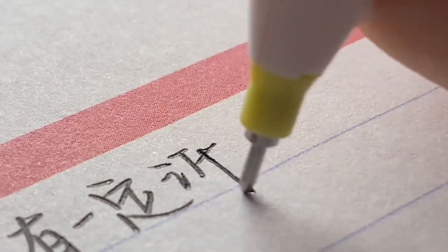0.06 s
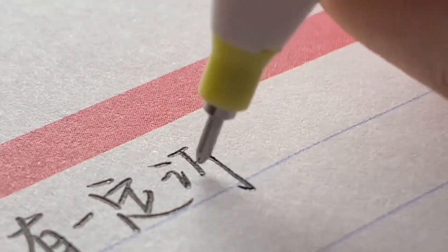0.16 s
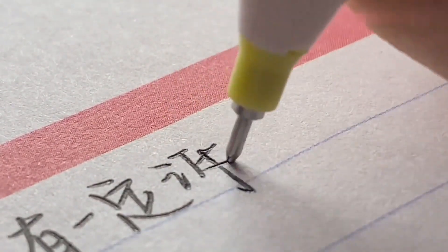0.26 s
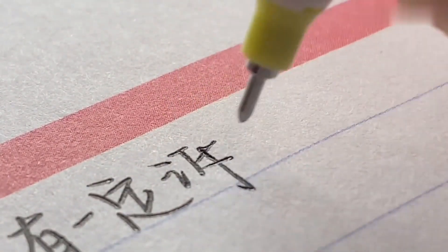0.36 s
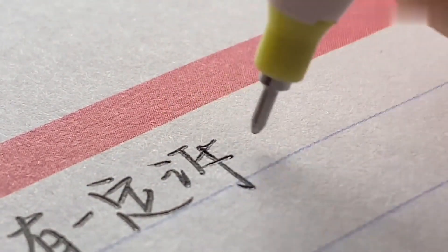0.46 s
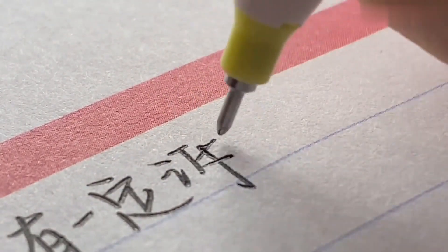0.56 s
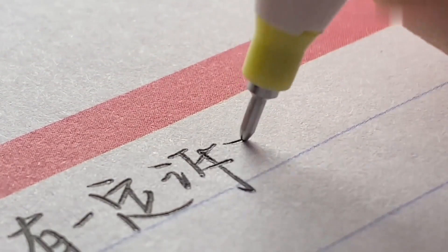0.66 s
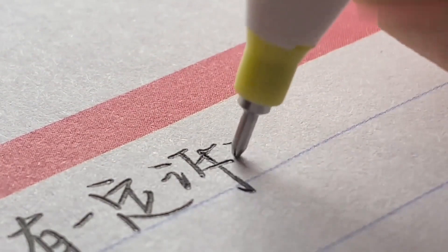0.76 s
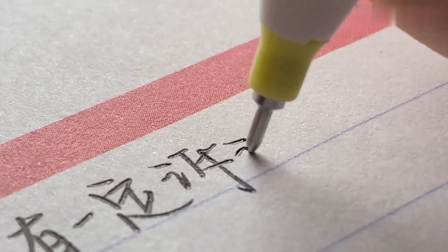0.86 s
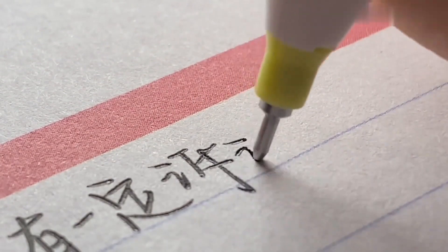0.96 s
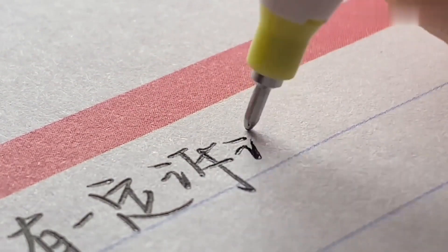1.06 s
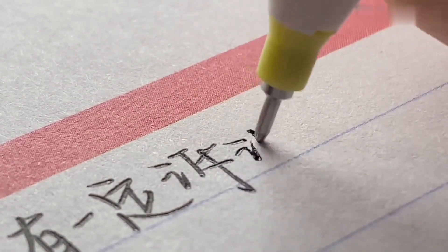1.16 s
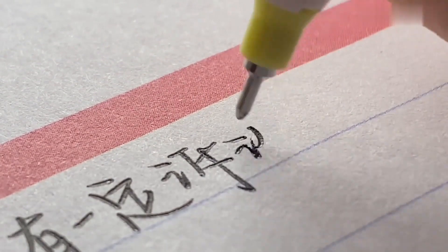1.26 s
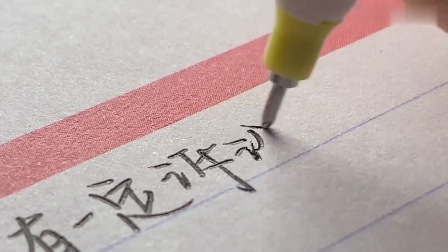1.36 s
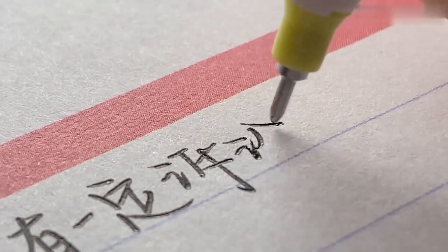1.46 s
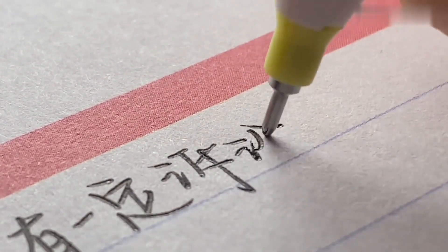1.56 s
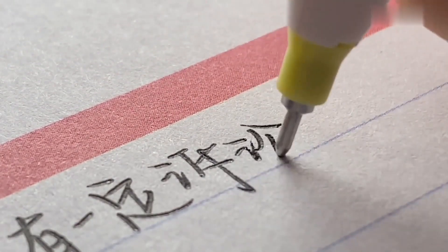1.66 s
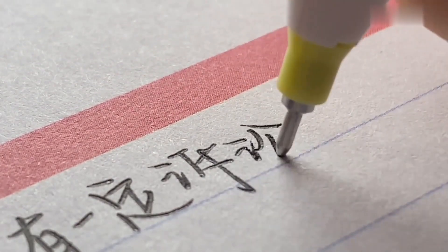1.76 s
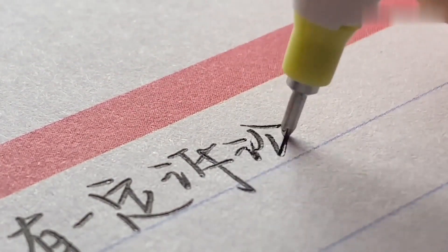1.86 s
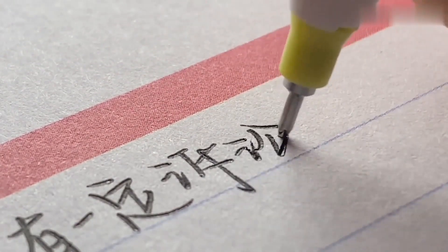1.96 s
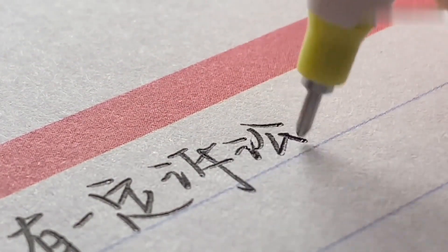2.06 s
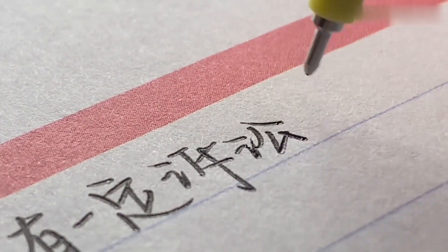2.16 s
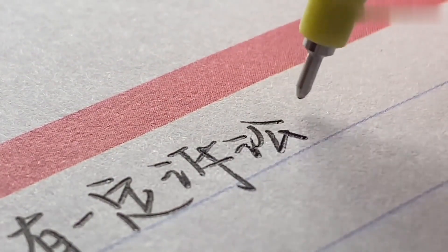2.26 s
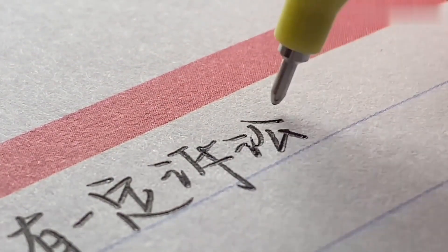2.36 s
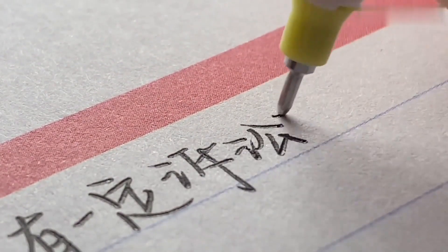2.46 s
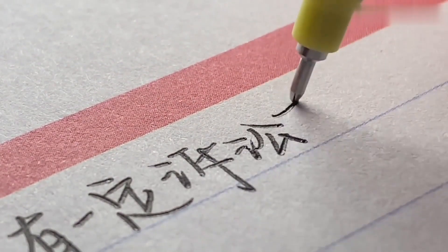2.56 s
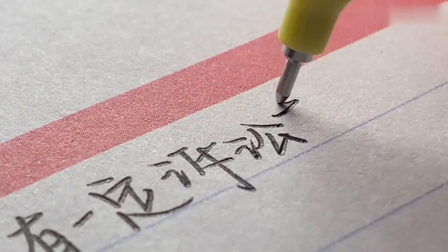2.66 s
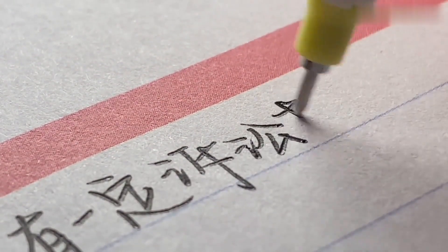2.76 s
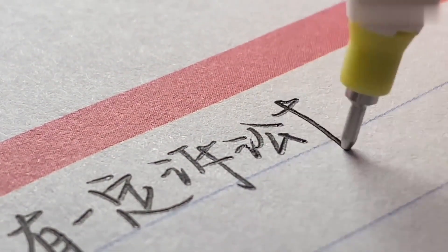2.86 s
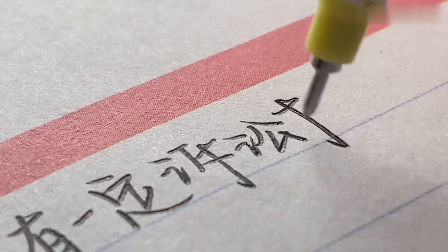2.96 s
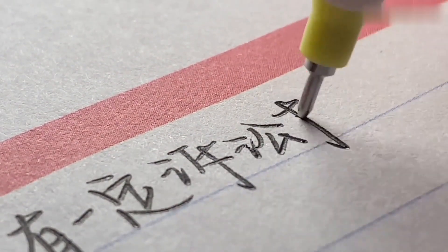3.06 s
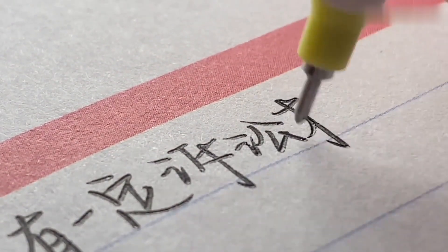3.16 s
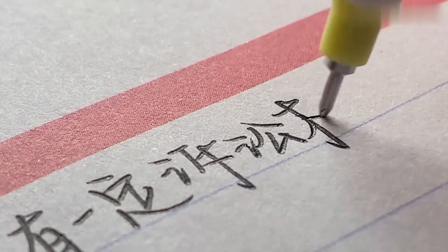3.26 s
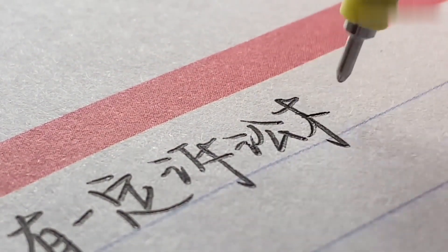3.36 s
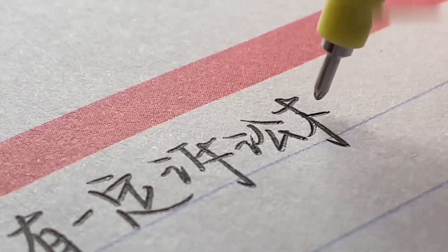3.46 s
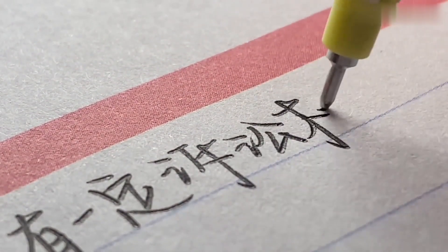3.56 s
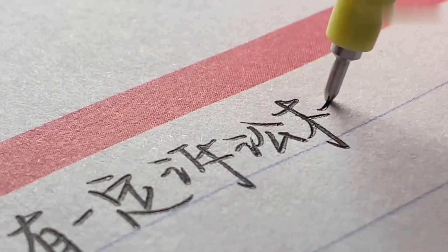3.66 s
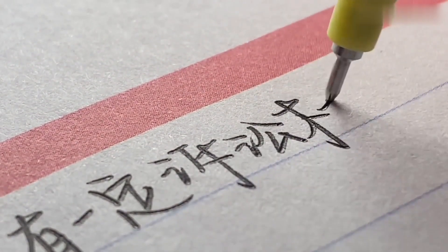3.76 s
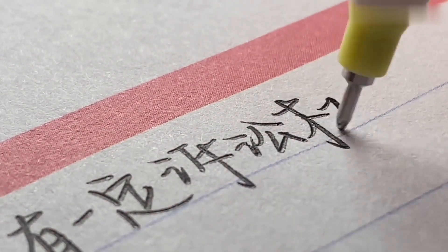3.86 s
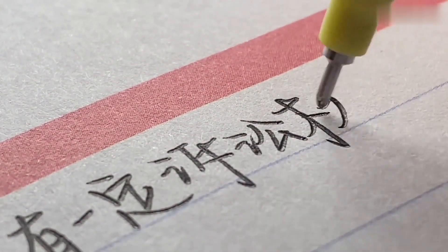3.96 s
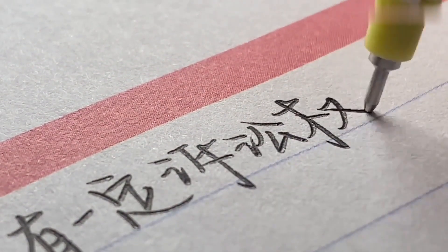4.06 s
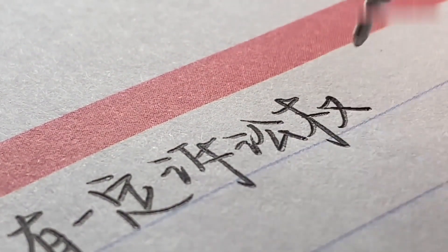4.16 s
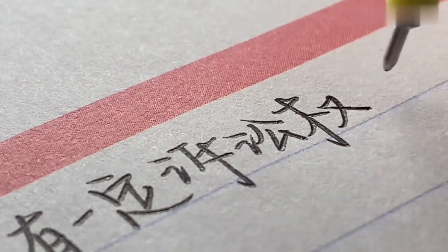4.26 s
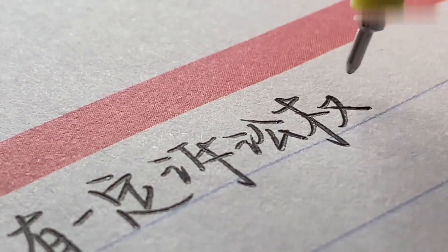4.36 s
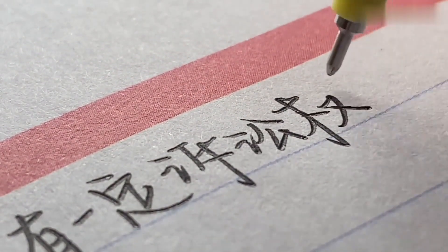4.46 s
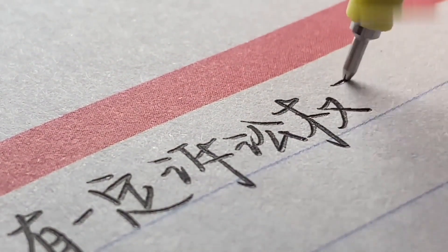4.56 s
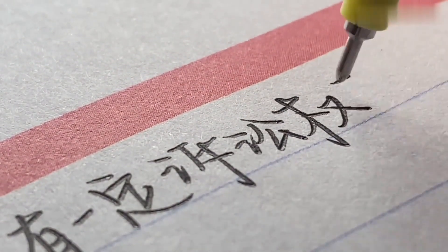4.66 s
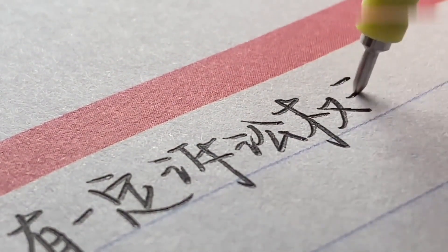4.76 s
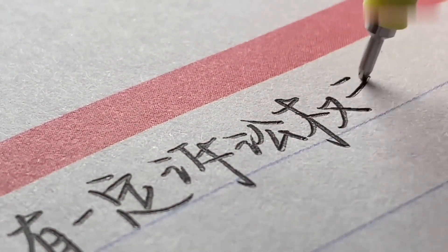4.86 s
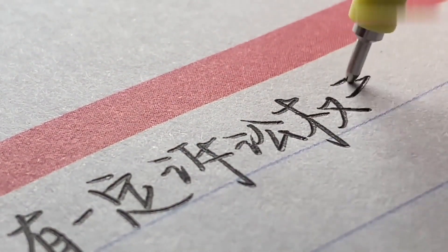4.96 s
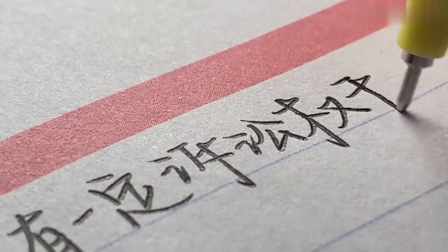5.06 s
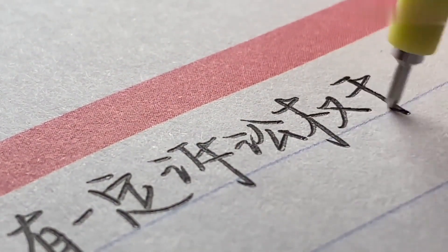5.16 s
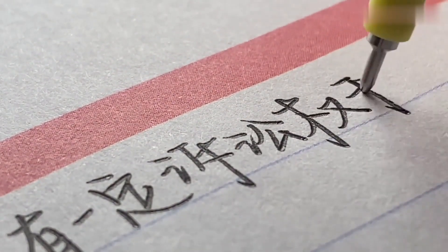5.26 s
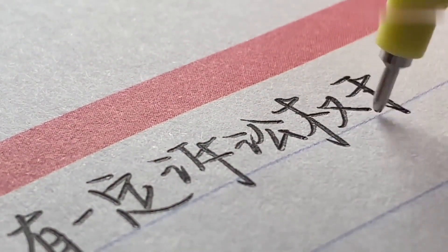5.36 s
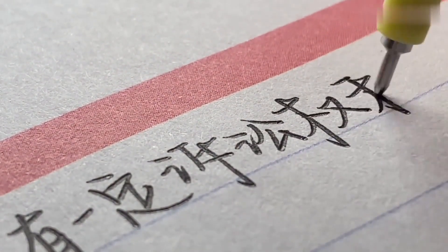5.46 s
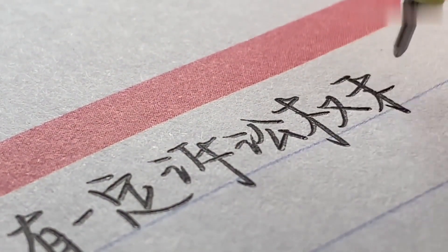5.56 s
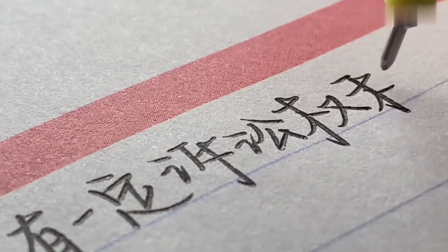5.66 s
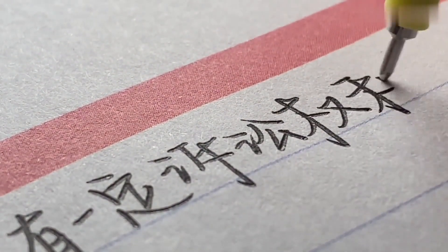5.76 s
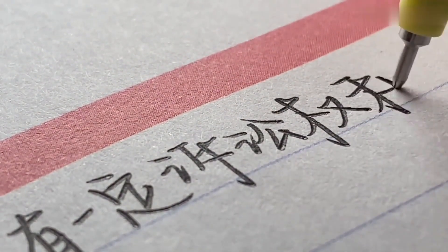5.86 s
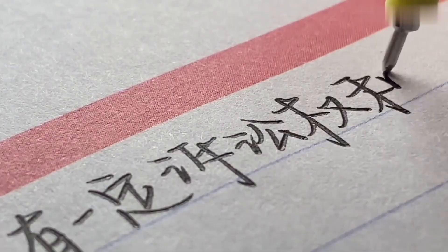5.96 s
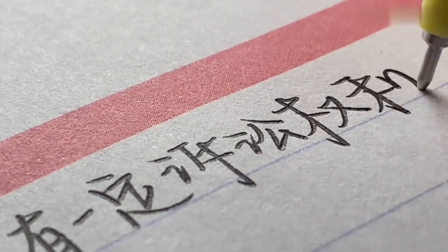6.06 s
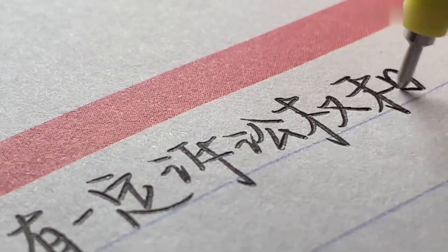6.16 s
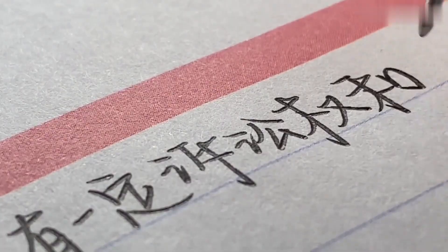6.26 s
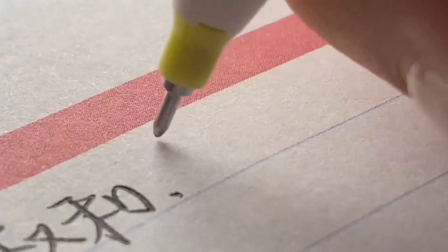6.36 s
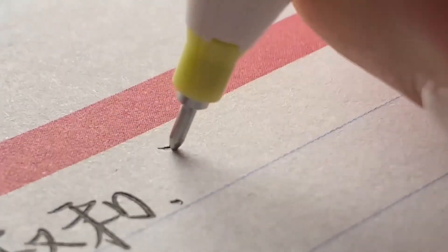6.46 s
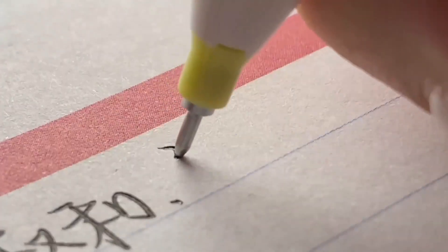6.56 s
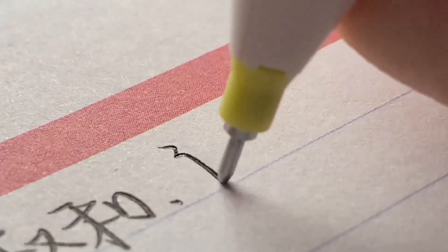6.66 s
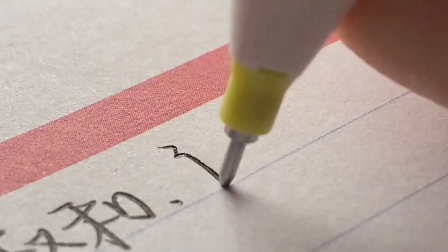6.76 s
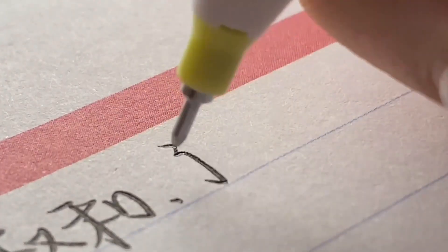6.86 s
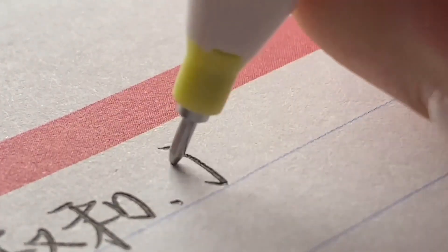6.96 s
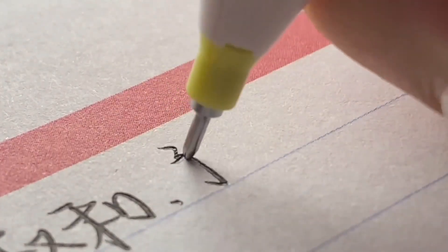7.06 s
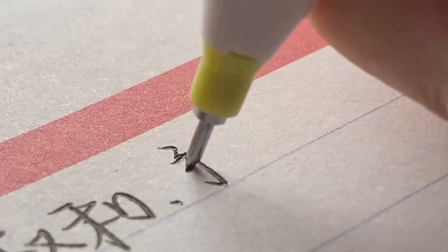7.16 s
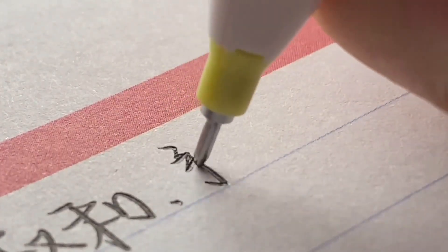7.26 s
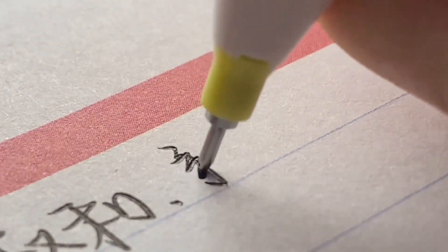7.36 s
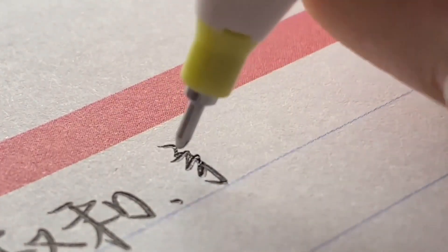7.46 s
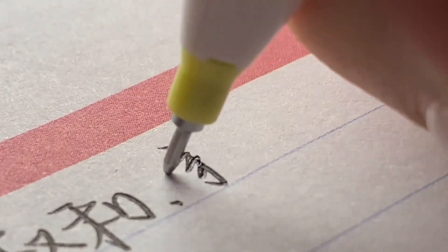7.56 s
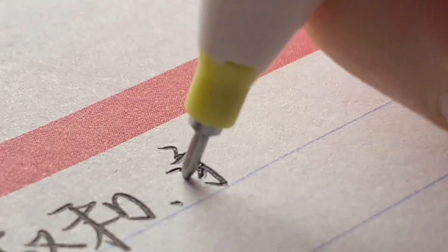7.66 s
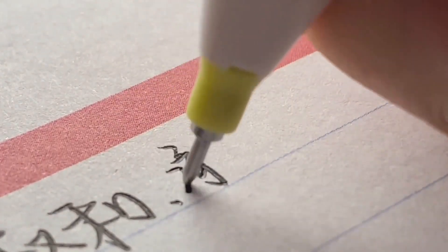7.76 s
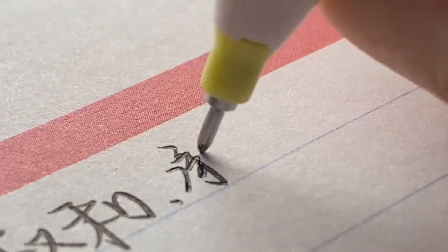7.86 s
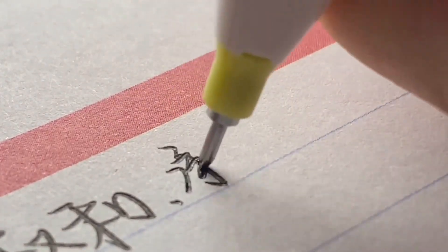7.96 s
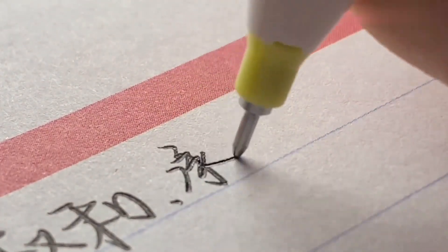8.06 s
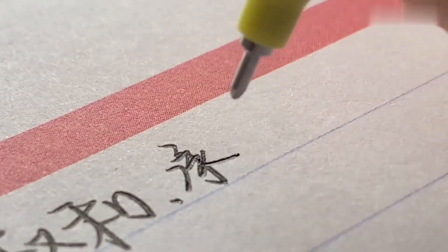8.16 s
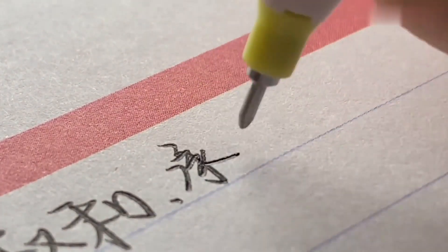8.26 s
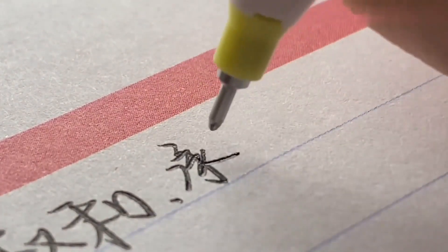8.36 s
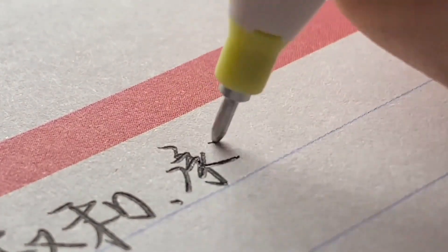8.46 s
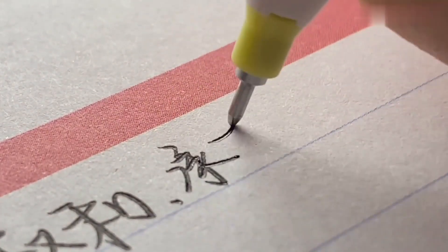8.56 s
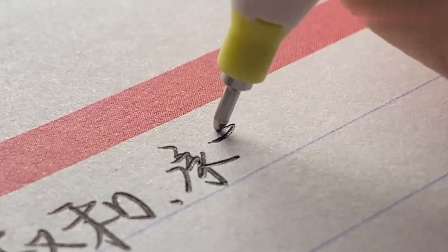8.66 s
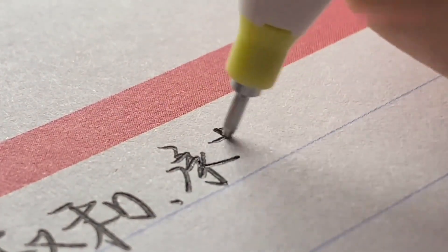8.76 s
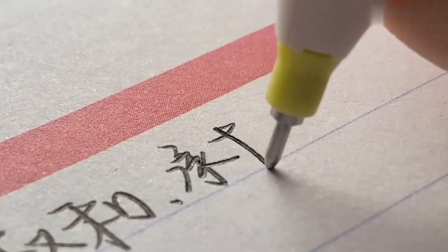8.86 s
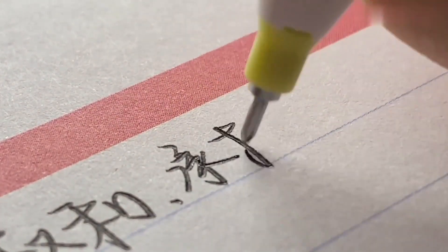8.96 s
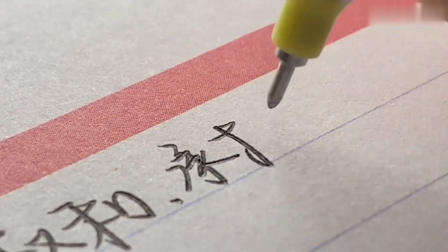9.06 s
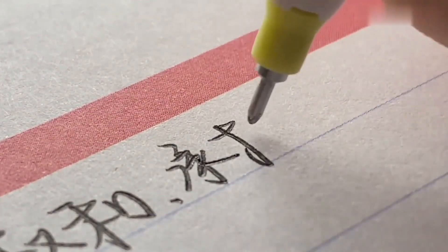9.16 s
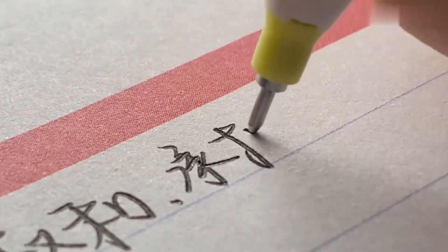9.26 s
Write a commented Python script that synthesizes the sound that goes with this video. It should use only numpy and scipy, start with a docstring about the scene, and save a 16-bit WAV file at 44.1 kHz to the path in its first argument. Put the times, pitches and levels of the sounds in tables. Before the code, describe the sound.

A fine-tipped pen writes on a paper pad in a quiet room, heard very close. Short dry scratches come several per second, uneven in strength, with a fine bright hiss. Crisp little ticks, often doubled, mark the tip landing and lifting, while the pad and desk give soft, low, hollow thumps beneath firmer strokes. Faint wavering room air fills the gaps.

```python
"""Short hissing strokes and bright ticks: a fine pen writes on a paper pad, close to the microphone in a quiet room.
Each stroke is friction: the tip slips over the fibres, which hiss and set the barrel ringing.
The loose refill ticks by impact as the tip lands and lifts, and snags shake the barrel.
The push of the hand makes the pad and the desk rumble at their resonances, over faint, wavering room air."""
import sys
import numpy as np
from scipy import signal
from scipy.fft import rfft, irfft, next_fast_len
from scipy.io import wavfile
from scipy.ndimage import uniform_filter1d

SR = 44100
rng = np.random.default_rng(int(sys.argv[2]) if len(sys.argv) > 2 else 0)


def unload_audio(sound):
    """Save the sound as a 16-bit wav file, at the path given as the first command line argument."""
    columns = np.transpose(np.atleast_2d(sound))
    # keep every value between -1 and 1, then stretch to whole-number steps
    steps = np.round(np.clip(columns, -1, 1) * 32767)
    wavfile.write(sys.argv[1], SR, steps.astype(np.int16))


N = 410571
TIME = np.arange(N) / SR  # s
FREQS = np.fft.rfftfreq(next_fast_len(N), 1 / SR)  # Hz

# All levels in the tables are relative: each layer adds its own gain.
# Strokes of the tip. Each row: time of full speed in seconds, length in seconds, scratch level in dB,
# weight on the pad in dB over the scratch, fine hiss in dB over the scratch.
STROKES = [(-0.048, 0.099, -54.5, 18, -0.5), (0.135, 0.057, -56.5, 3, 2.5), (0.257, 0.047, -53, 6.5, 1),
           (0.399, 0.068, -51.0, -2, -3), (0.527, 0.057, -55.5, -7, 1.5), (0.663, 0.051, -58.5, 14, -1.5),
           (0.906, 0.047, -65.0, 6, 6), (1.039, 0.046, -57.0, 9.5, 0.5), (1.206, 0.082, -64.5, 15.5, 3),
           (1.279, 0.041, -59.5, -33, 3.5), (1.396, 0.049, -49.5, 4, -0.5), (1.491, 0.054, -62.5, 8.5, -1),
           (1.656, 0.041, -61.5, 7.5, 2.5), (1.845, 0.049, -59.5, 10.5, 3.5), (2.04, 0.05, -58, 15, 2),
           (2.179, 0.073, -48, -3.5, -5.5), (2.329, 0.11, -60.5, -6, 0), (2.514, 0.053, -54.5, 8.5, 3.5),
           (2.823, 0.051, -48, 15, 0.5), (2.98, 0.059, -56.5, 7, 2), (3.153, 0.11, -61, 13, 1.5),
           (3.289, 0.046, -54.5, 16, 2.5), (3.361, 0.048, -53, 6.5, -3), (3.464, 0.043, -69.0, -1, -1),
           (3.856, 0.061, -60.0, 16.5, 3.5), (3.923, 0.047, -55.5, -0.5, 2), (4.049, 0.052, -51, 10, 1),
           (4.132, 0.101, -59.5, 8, 0), (4.229, 0.076, -50.5, -7, -4.5), (4.347, 0.065, -57.5, -1, 3),
           (4.429, 0.067, -59.0, 6, -0.5), (4.585, 0.034, -62.0, 17.5, -1), (4.678, 0.045, -61, -9, -3),
           (4.819, 0.057, -54.5, 5.5, 0.5), (4.92, 0.062, -74, 1, 8), (5.081, 0.05, -52, 15.5, 2),
           (5.211, 0.056, -57.5, 10, 2), (5.391, 0.08, -60.0, 8.5, 1.5), (5.516, 0.052, -52.5, 11, 1),
           (5.594, 0.058, -51, 3, -4.5), (5.82, 0.034, -63, 11, 4.5), (5.941, 0.056, -76, 22, 11.5),
           (6.065, 0.051, -57, 10.5, 3), (6.197, 0.043, -57.5, 12.5, 3), (6.265, 0.091, -59, -13, -2),
           (6.437, 0.089, -64.5, 8.5, -3), (6.662, 0.065, -54.0, 12.5, 3), (6.859, 0.059, -52.5, 1.5, 0.5),
           (7.041, 0.03, -63, 15, 5), (7.209, 0.057, -69.5, 17.5, 8), (7.31, 0.04, -65, 17.5, 3),
           (7.411, 0.046, -65, 18.5, 3), (7.492, 0.072, -66.0, -8, -1), (7.62, 0.081, -66.5, 9, -13),
           (7.708, 0.043, -63.5, 17, 5.5), (7.847, 0.049, -54.5, -10, -2), (8.056, 0.065, -53.5, 13.5, 2),
           (8.19, 0.074, -53, -4, -1.5), (8.368, 0.09, -58.5, -3, 0.5), (8.53, 0.064, -56.5, 13, 1),
           (8.659, 0.1, -77, 13, 11), (8.825, 0.05, -52.5, 15.5, 4), (8.975, 0.13, -68.5, 18.5, 7),
           (9.036, 0.079, -51.0, -8, -1.5), (9.182, 0.071, -72.5, 1, 2), (9.304, 0.02, -60.5, 16.5, 0.5)]
# The tip lands and the refill ticks twice. Each row: start in seconds, level in dB, strongest pitch in Hz,
# time to the second tick in seconds, second tick in dB over the first.
LANDINGS = [(0.2037, -27.5, 3230, 0.0072, 4), (0.601, -29, 3100, 0.013, 4.5),
            (0.7584, -32, 3400, 0.015, -2), (1.078, -41, 4600, 0.025, 3), (1.3455, -33.5, 3250, 0.0134, 4),
            (1.5554, -40, 3570, 0.019, 3.5), (2.4259, -31, 3580, 0.021, 3.5),
            (3.058, -27.5, 3560, 0.007, -3), (3.2443, -26, 3470, 0.006, -2), (3.546, -31, 3560, 0.009, 0),
            (4.0023, -32, 4200, 0.0056, 5), (4.52, -29, 3000, 0.0086, 2), (4.741, -32, 4100, 0.0071, 3.5),
            (5.2832, -30.5, 4200, 0.0058, 0), (5.7455, -33.5, 4200, 0.011, 2),
            (6.3964, -32, 2830, 0.021, 1.5), (6.9767, -25, 3050, 0.0081, 0), (7.5787, -28, 3140, 0.0084, 2),
            (7.878, -34.5, 3800, 0.019, -4), (8.4618, -28.5, 2970, 0.01, 0.5),
            (9.2204, -34, 3380, 0.0155, -0.5)]
# The tip catches on the paper and slips free. Each row: start in seconds, level in dB.
SNAGS = [(0.685, -49), (2.0223, -36), (2.5017, -30), (3.3398, -36.5), (4.0372, -33), (5.529, -47),
         (5.5662, -36), (6.2412, -46), (7.7029, -47), (8.0352, -32), (8.5167, -38), (9.0169, -45)]
# The hand jabs the pad at the height of a hard stroke. Each row: time in seconds, level in dB.
JABS = [(1.388, -34.5), (2.027, -39.5), (2.812, -33.5), (2.834, -37), (4.043, -30.5), (5.074, -23.5),
        (5.495, -38), (6.075, -32), (8.818, -30)]
JAB_S = 0.0089  # rise and fall time
# Resonances of the barrel. Each row: frequency in Hz, width in Hz, level in dB.
BARREL = [(1748, 83, 1.5), (2012, 124, 12), (2050, 47, -13.5)]
# Resonances of the refill. Each row: frequency in Hz, width in Hz, level in dB.
REFILL = [(2300, 330, -2), (3100, 360, 1.5), (3800, 2500, -9.5), (4690, 650, 1.5), (6150, 790, -15.5),
          (11500, 5000, -1)]


def tip(ring_db, scratch_db, hiss_db, catch_db, tooth_db):
    """Friction noise: fibres rasp and ring the barrel, coarse ones catch; paper tooth modulates all together."""
    # Rasp of the fibres. Each row: frequency in Hz, density in dB per Hz.
    scratch_spectrum = [(700, -3), (1100, -19.5), (1400, -9), (2500, -6.5), (3200, -4.5), (4000, -4.5),
                        (5200, 0.5), (6500, -4.5), (7800, -13), (9500, -31)]
    # Fine hiss of the fibres. Each row: frequency in Hz, density in dB per Hz.
    hiss_spectrum = [(6000, -11.5), (8000, -1.5), (13500, 3.5), (15000, 2.5), (16000, -15)]
    catches_per_s = 160  # coarse fibres met while the tip moves
    ring, scratch, hiss = friction(skid_ring_db=0, skid_hiss_db=-1.5)
    tooth = from_db(tooth_db * drift(rate=54))
    drive = coloured(fibres(grain_db=0.5), [(1200, -4.5), (1800, 5.5), (2800, -4.0)])
    barrel = rms_one(resonate(drive, BARREL))
    rasp = coloured(fibres(grain_db=2.0), scratch_spectrum)
    fine = coloured(fibres(grain_db=3), hiss_spectrum)
    coarse = (rng.random(N) < catches_per_s / SR) * rng.standard_normal(N)
    catches = rms_one(resonate(coarse, [*BARREL, *REFILL]))
    ringing = from_db(ring_db) * ring * barrel
    scratching = scratch * (from_db(scratch_db) * rasp + from_db(catch_db) * catches)
    hissing = from_db(hiss_db) * hiss * fine
    return tooth * (ringing + scratching + hissing)


def friction(skid_ring_db, skid_hiss_db):
    """Friction follows sliding: ring, scratch and hiss swell with strokes and landing skids; jabs add ring."""
    slowing = 0.8  # time a stroke takes to slow down, over the time it takes to speed up
    barrel_follows = 0.21  # dB of ring gained per dB of weight
    skid_db, skid_rise_s, skid_fall_s = -35.5, 0.011, 0.042  # after landing the tip skids a little
    jab_ring_db = -16.5  # a jab also rings the barrel
    strokes = [(s, length / 2, slowing * length / 2, db + barrel_follows * weight, db, db + bright)
               for s, length, db, weight, bright in STROKES]
    skids = [(s + gap, skid_rise_s, skid_fall_s, db + skid_db) for s, db, _, gap, _ in LANDINGS]
    stroke_strength = swells(strokes, fall_shape=2.26)
    skid_strength = swells(skids, fall_shape=1.05) * from_db([[skid_ring_db], [0], [skid_hiss_db]])
    ring, scratch, hiss = np.hypot(stroke_strength, skid_strength)
    jab, = swells([(s, JAB_S, JAB_S, db + jab_ring_db) for s, db in JABS], fall_shape=1.3)
    return np.hypot(ring, jab), scratch, hiss


def refill(tick_db, snag_db):
    """Impact excitation: landings and lifts tick the refill, slightly wide; a snag shakes the whole barrel."""
    # Single clicks of the refill as a stroke turns or lifts off. Each row: start in seconds, level in dB.
    click_rows = [(.0977, -35), (0.265, -33), (0.3052, -30), (1.2307, -32.5), (1.463, -23.5),
                  (2.0749, -28.5), (3.161, -32), (3.8895, -24.5), (4.1016, -22), (4.6198, -41),
                  (5.194, -35.5), (5.4812, -22.5), (6.1905, -26), (6.544, -42), (6.8343, -25),
                  (7.2759, -43), (7.3978, -32.5)]
    click_hz, snag_hz = 4600, 2030  # favoured pitches
    contacts = [(s, db, hz) for s, db, hz, _, _ in LANDINGS]
    contacts += [(s + gap, db + rebound, hz) for s, db, hz, gap, rebound in LANDINGS]
    contacts += [(s, db, click_hz) for s, db in click_rows]
    ticks = knocks(contacts, REFILL, focus_db=7.5, chatter=0.095, chatter_s=0.0027)
    quadrature = np.imag(signal.hilbert(ticks, next_fast_len(N)))[:N]
    ticks = spread(ticks, quadrature, side_db=-17, pan_db=0)
    snag_contacts = [(s, db, snag_hz) for s, db in SNAGS]
    snags = knocks(snag_contacts, BARREL, focus_db=5, chatter=0.47, chatter_s=0.0019)
    return from_db(tick_db) * ticks + from_db(snag_db) * snags


def knocks(events, modes, focus_db, chatter, chatter_s):
    """Modal impact: a blow and its dying chatter, band-limited, excite most the modes near the contact's pitch."""
    out, age = np.zeros(N + SR), TIME[:SR // 30]
    chatter_noise = rng.standard_normal((len(events), len(age)))
    for (s, db, pitch), noise in zip(events, chatter_noise):
        force = chatter * noise * np.exp(-age / chatter_s) + (age == 0)
        band = signal.butter(2, [0.45 * pitch, 1.6 * pitch], "band", fs=SR, output="sos")
        force = signal.sosfilt(band, force)
        focused = [(hz, width, level - focus_db * np.tanh(2 * abs(np.log2(hz / pitch))))
                   for hz, width, level in modes]
        sound = resonate(force, focused)
        start = int((s + 0.0007) * SR)  # the blow falls 0.7 ms after the listed start
        out[start:start + len(age)] += from_db(db) * sound / np.linalg.norm(sound)
    return out[:N]


def pad_and_desk(desk_db, pad_db, boom_db, sheet_db, lump_db, firm_db):
    """Forced resonance: a push thuds into the desk and shakes the pad and its top sheet in uneven lumps."""
    # Resonances of the pad. Each row: frequency in Hz, width in Hz, level in dB.
    pad_modes = [(193, 84, 1), (272, 134, -7), (357.2, 20.4, 3), (404, 27, -10)]
    # The pad's one booming mode. Each row: frequency in Hz, width in Hz, level in dB.
    boom_modes = [(359.6, 27.5, 0)]
    # Resonances of the top sheet. Each row: frequency in Hz, width in Hz, level in dB.
    sheet_modes = [(671, 147, 30), (804, 29, 22), (1260, 200, -20)]
    # Deep resonance of the desk. Each row: frequency in Hz, width in Hz, level in dB.
    deep_modes = [(57.7, 16.3, 0)]
    # Upper resonances of the desk. Each row: frequency in Hz, width in Hz, level in dB.
    upper_modes = [(87.5, 15.6, -0.5), (111, 56, -11)]
    deep, upper, body, top = load(release=0.75, deep_db=-0.5, upper_db=-2.0, top_db=-1.5)
    lumps = from_db(lump_db * np.tanh(drift(rate=29)))
    thuds = [deep * shaken(deep_modes, 37.6, 77) + upper * shaken(upper_modes, 58.0, 151) for _ in range(2)]
    desk = spread(*thuds, side_db=-15, pan_db=0.6)
    pad = spread(shaken(pad_modes, 136, 407), shaken(pad_modes, 155, 420), side_db=-8.5, pan_db=2.0)
    boom = spread(shaken(boom_modes, 187, 410), 0, side_db=0, pan_db=4.0)
    sheet = spread(shaken(sheet_modes, 545, 1220), shaken(sheet_modes, 640, 1400), side_db=-7.5, pan_db=4.0)
    # the firmer the push, the more of the pad's energy goes into its one booming mode
    firm = body ** 2 / (body ** 2 + from_db(firm_db) ** 2)
    pad = from_db(pad_db) * np.sqrt(1 - firm) * pad + from_db(boom_db) * np.sqrt(firm) * boom
    return from_db(desk_db) * desk + lumps * (body * pad + from_db(sheet_db) * top * sheet)


def load(release, deep_db, upper_db, top_db):
    """Load transfer: strength of the desk's two parts, pad and sheet; heavier strokes reach deeper."""
    # The hand shifts its weight and the desk thuds.
    # Each row: time in seconds, deep mode level in dB, upper modes level in dB.
    thud_rows = [(0.011, -36, -35), (0.167, -47, -60), (0.304, -36, -50), (0.819, -41.5, -48),
                 (0.937, -40.5, -56), (1.234, -41.5, -44), (1.663, -41, -38), (2.508, -42, -40),
                 (2.801, -58, -36), (3.146, -58, -37.5), (3.288, -54, -50), (3.596, -47, -59),
                 (3.862, -49, -32), (4.129, -51, -65), (4.866, -40.5, -60), (5.13, -44, -40),
                 (5.37, -42, -37.5), (5.503, -63, -46), (6.086, -39.5, -28.5), (6.194, -39, -44),
                 (6.708, -51, -58), (7.064, -45, -43), (7.343, -42, -42.5), (7.412, -40, -50),
                 (7.626, -40, -63), (7.728, -32, -39.5), (7.98, -37, -46), (8.506, -52, -48),
                 (8.859, -35, -47), (9.277, -51, -63)]
    sheet_follows, desk_follows = 0.59, 1.01  # dB gained per dB of weight
    settle_db, settle_rise_s, settle_fall_s = -23, 0.0045, 0.066  # the pad gives under a landing
    thud_rise_s, thud_fall_s = 0.02, 0.02
    flick_db, flick_s = -7, 0.0097  # each snag flicks the top sheet
    strokes = [(s, length / 2, release * length / 2,
                db + desk_follows * weight, db + weight, db + sheet_follows * weight)
               for s, length, db, weight, _ in STROKES]
    desk, pad, sheet = swells(strokes, fall_shape=1.2)
    settling = [(s + gap, settle_rise_s, settle_fall_s, db + settle_db) for s, db, _, gap, _ in LANDINGS]
    settle, = swells(settling, fall_shape=1.17)
    thuds = [(s, thud_rise_s, thud_fall_s, *levels) for s, *levels in thud_rows]
    deep, upper = swells(thuds, fall_shape=1.3)
    jab, = swells([(s, JAB_S, JAB_S, db) for s, db in JABS], fall_shape=1.6)
    flick, = swells([(s, flick_s / 2, flick_s, db + flick_db) for s, db in SNAGS], fall_shape=1.3)
    parts = ([from_db(deep_db) * desk, deep, settle],
             [from_db(upper_db) * desk, upper, settle],
             [pad, jab, settle],
             [from_db(top_db) * sheet, flick])
    return [np.linalg.norm(part, axis=0) for part in parts]  # powers add


def room(level_db):
    """Partly coherent noise: quiet air that wavers, wide in the low mids and centred in the treble."""
    # Air of the room. Each row: frequency in Hz, density in dB per Hz.
    air_spectrum = [(28, -7), (55, 0.5), (150, -2), (300, -15), (580, -25), (820, -11.5), (1000, -30.5),
                    (1500, -34), (2000, -30), (2700, -35.5), (5000, -35.5), (8000, -39), (15000, -39.5)]
    # The air dips briefly. Each row: time in seconds, level offset in dB.
    air_dip = [(6.32, 2), (6.335, -19), (6.35, -11), (6.365, 0.5)]
    waver_db, waver_per_s = 2, 6.8
    mid, side = coloured(rng.standard_normal((2, N)), air_spectrum)
    width = from_db(np.interp(FREQS, [60, 400, 1500, 2400], [-15.5, -8.5, 2.5, -41]))
    offset_db = waver_db * drift(waver_per_s) + np.interp(TIME, *np.transpose(air_dip))
    air = spread(mid, filtered(side, width), side_db=0.5, pan_db=0.5)
    return from_db(level_db + offset_db) * air


def fibres(grain_db):
    """Stick-slip friction force: a dense run of tiny slips of uneven size."""
    return rms_one(rng.standard_normal(N) * from_db(grain_db * rng.standard_normal(N)))


def shaken(modes, low_hz, high_hz):
    """Sustained resonance: a soft body kept ringing evenly by the dragging tip, weak outside its own range."""
    band = signal.butter(2, [low_hz, high_hz], "band", fs=SR, output="sos")
    ringing = signal.sosfilt(band, resonate(fibres(grain_db=8.5), modes))
    return steadied(rms_one(ringing), span_s=0.0238)


def resonate(x, modes):
    """Modal superposition: parallel two-pole resonances, each with its own gain on top."""
    out = 0
    for hz, width, db in modes:
        r = np.exp(-np.pi * width / SR)  # pole radius: the wider, the quicker the decay
        zeros = np.array([1, 0, -1]) * (1 - r * r) / 2
        poles = [1, -2 * r * np.cos(2 * np.pi * hz / SR), r * r]
        out = out + from_db(db) * signal.lfilter(zeros, poles, x + 1e-18)
    return out


def swells(rows, fall_shape):
    """Energy envelopes: each row (s, rise s, fall s, dB, ..) rises in a bell and dies away; a curve per level."""
    power = np.zeros((len(rows[0][3:]), N))
    for s, rise, fall, *levels in rows:
        near = slice(*np.searchsorted(TIME, [s - 3 * rise, s + 5 * fall]))
        lag = TIME[near] - s
        decay = np.where(lag < 0, (lag / rise) ** 2, np.abs(lag / fall) ** fall_shape)
        power[:, near] += from_db(levels)[:, None] ** 2 * np.exp(-decay)
    return np.sqrt(power)


def steadied(x, span_s):
    """Amplitude levelling: hold the strength of a narrow vibration even over span_s."""
    return x / np.sqrt(uniform_filter1d(x * x, max(int(span_s * SR), 1)) + 1e-3)


def drift(rate):
    """Low-passed noise: smooth chance with about rate turns a second; rms 1."""
    return rms_one(filtered(rng.standard_normal(N), 1 / (1 + (FREQS / rate) ** 2)))


def coloured(x, spectrum):
    """Spectral shaping: weight x by a spectrum that falls away beyond its ends; rms 1."""
    hz, db = np.transpose(spectrum)
    hz = np.r_[hz[0] / 2, hz, hz[-1] * 2]
    db = np.r_[db[0] - 40, db, db[-1] - 40]
    gain_db = np.interp(np.log(FREQS + 1), np.log(hz), db)
    return rms_one(filtered(x, from_db(gain_db)))


def filtered(x, gain):
    """Linear filtering: apply one gain per frequency."""
    size = next_fast_len(N)
    return irfft(rfft(x, size) * gain, size)[..., :N]


def spread(mid, side, side_db, pan_db):
    """Mid-side stereo: left and right from a shared and an opposed part, with a level difference pan_db."""
    pair = mid + from_db(side_db) * side * np.array([[1], [-1]])
    return pair * from_db(np.array([[pan_db], [-pan_db]]) / 2)


def from_db(db):
    """Decibel law: amplitude ratio of a level."""
    return 10 ** (np.asarray(db) / 20)


def rms_one(x):
    """Power normalisation: scale x to an rms of 1."""
    return x / np.sqrt(np.mean(x ** 2) + 1e-20)


def scene():
    """Superposition: pen, paper and desk over the air of the room."""
    pen = tip(ring_db=-2.5, scratch_db=0.52, hiss_db=0.7, catch_db=-10, tooth_db=2.0)
    pen = pen + refill(tick_db=6.5, snag_db=18.5)
    support = pad_and_desk(desk_db=0.94, pad_db=-2.5, boom_db=-5.5, sheet_db=-5.5, lump_db=5.5, firm_db=-34)
    return pen + support + room(level_db=-56.5)


def record(dry):
    """Phase rotation: the right channel turns in the low treble and increasingly above 7.5 kHz; edges are cut."""
    # Phase turn of the right channel, a stereo widening. Each row: frequency in Hz, phase in radians.
    widening_phase = [(1100, 0), (1500, -1.2), (1800, -.4), (2150, 0), (7450, 0), (8950, 3.14),
                      (11100, 6.28), (13350, 9.42), (15300, 12.57)]
    bass_cut_hz, top_cut_hz = 33, 15900
    phase = np.interp(FREQS, *np.transpose(widening_phase))
    channels = np.array([dry[0], filtered(dry[1], np.exp(1j * phase))])
    low_edge = FREQS ** 3 / np.sqrt(FREQS ** 6 + bass_cut_hz ** 6)
    return filtered(channels, low_edge / np.sqrt(1 + (FREQS / top_cut_hz) ** 160))


dry = scene()
out = record(dry)
unload_audio(out)
```